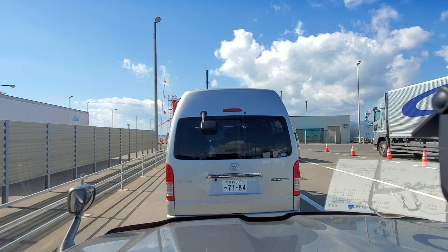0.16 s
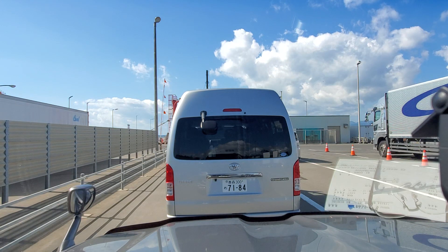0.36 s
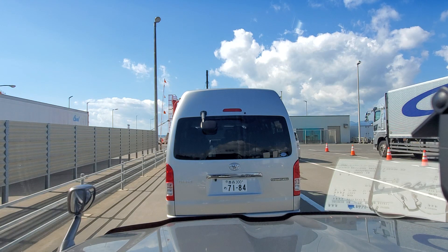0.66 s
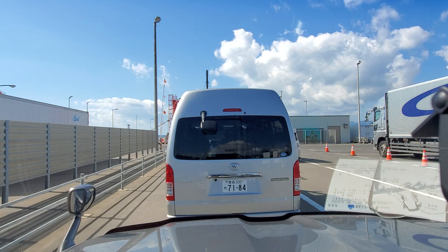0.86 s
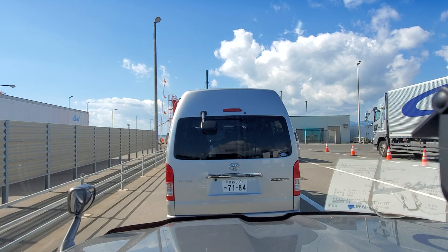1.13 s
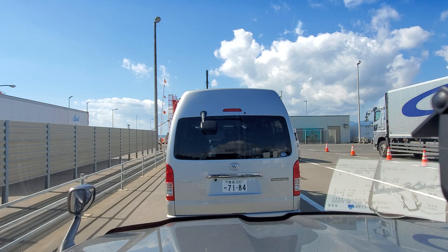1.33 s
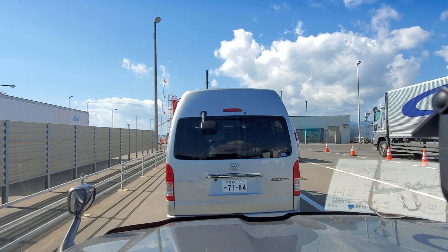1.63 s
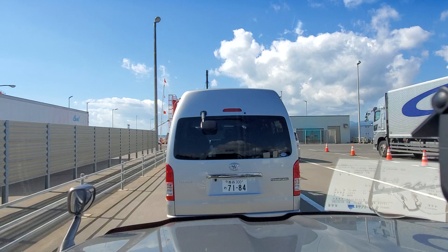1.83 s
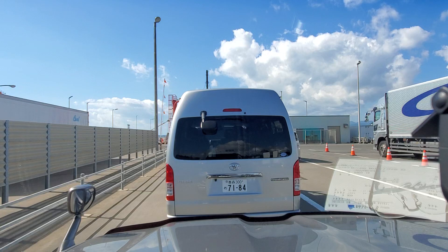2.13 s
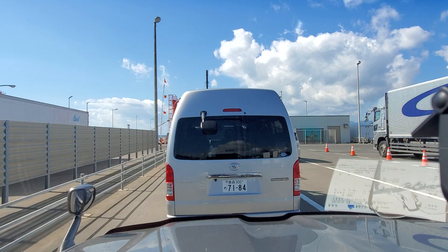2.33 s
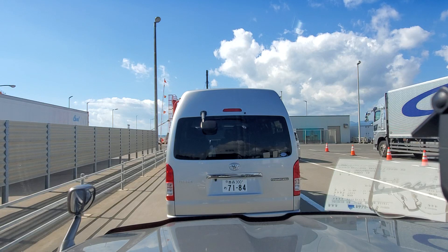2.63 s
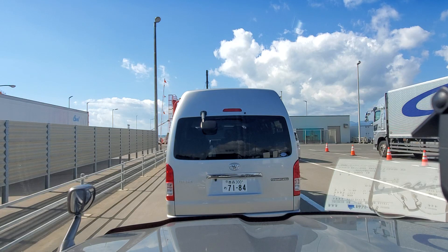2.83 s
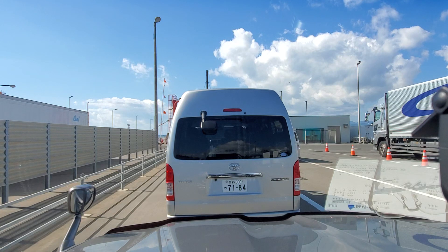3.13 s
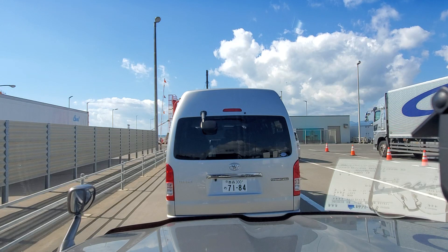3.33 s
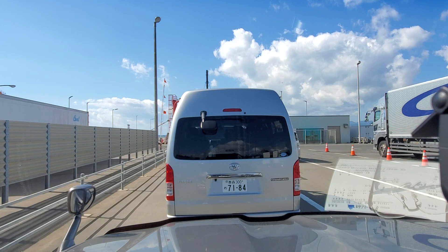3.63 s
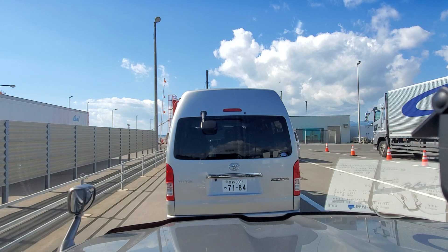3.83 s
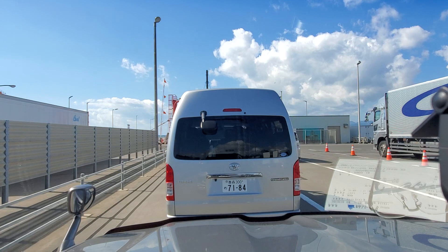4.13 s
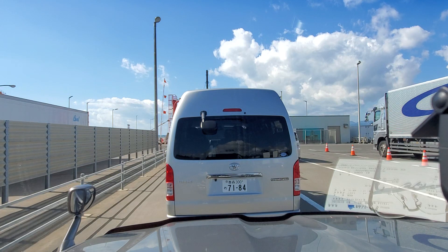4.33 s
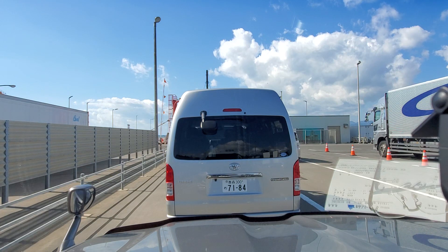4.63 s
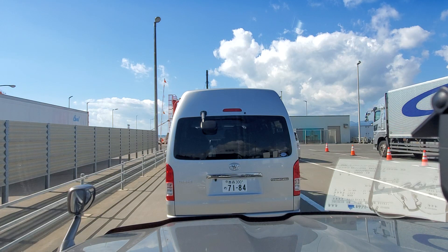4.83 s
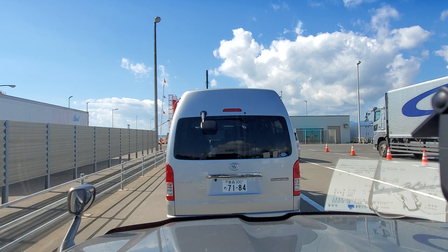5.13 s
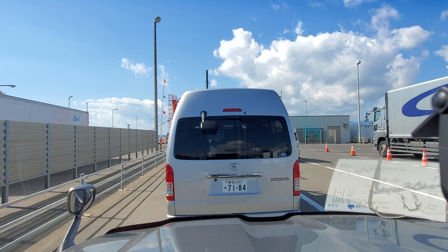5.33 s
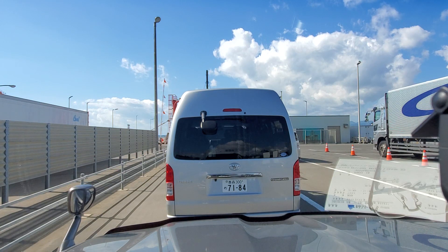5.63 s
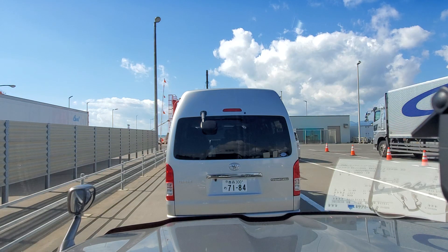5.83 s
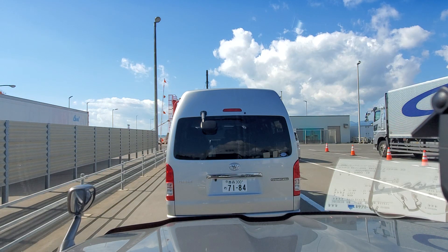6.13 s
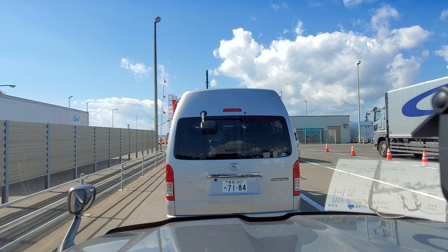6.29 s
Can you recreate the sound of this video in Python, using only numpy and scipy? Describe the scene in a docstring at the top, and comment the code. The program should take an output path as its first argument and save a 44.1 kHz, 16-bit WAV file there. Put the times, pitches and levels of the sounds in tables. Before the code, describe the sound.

Inside a waiting car, deep engine rumble pulses and slowly swells over light diesel knocking, while a short hiss of air sounds outside.

```python
"""Inside a car idling in a queue of vans and trucks. From the start its exhaust boom beats against the firing
tones of neighbouring engines, noise comes through the panels, a tone near 200 Hz drones and a diesel knocks; a
faint whistle comes and goes. Near 1.5 s the low throb shifts as engine tones near 53 and 57 Hz stand out, and
an air valve hisses briefly outside. After 4 s the boom swells, to be strongest near 6 s. A close pair of
microphones widens the middle range."""
import sys
import numpy as np
from scipy import signal
from scipy.fft import rfft, irfft, next_fast_len
from scipy.io import wavfile
from scipy.ndimage import uniform_filter1d, map_coordinates

SR = 44100
rng = np.random.default_rng(int(sys.argv[2]) if len(sys.argv) > 2 else 0)


def unload_wav(signal):
    """Save mono or channel-first audio to the path in sys.argv[1] as 16-bit WAV at rate SR, clipped to [-1, 1]."""
    wavfile.write(
        sys.argv[1],
        SR,
        np.round(np.clip(np.atleast_2d(signal).T, -1, 1) * 32767).astype(np.int16),
    )


N = 284871
TIME = np.arange(N) / SR
OPPOSITE = np.array([[1], [-1]])  # sign of a difference signal, left and right

# Noise spectra, common to both microphones or (SIDE) their difference.
# Each row: frequency in Hz, relative spectral density in dB.
RUMBLE_MID, RUMBLE_SIDE = [(10, -34), (20, -17), (29, -5), (38, -8), (43, -11), (52, -8), (62, -8),
                           (80, -10), (100, -13.5), (150, -13), (200, -15), (255, -17), (330, -25),
                           (360, -80)], [(12, -42), (20, -12.5), (33, -1), (48, 1), (60, -5), (118, -27),
                                           (195, 1.5), (233, -7), (295, -1), (340, -3), (440, -40),
                                           (750, -120)]
BODY_MID, BODY_SIDE = [(180, -25), (300, -5.5), (323, -5.5), (371, 1.5), (430, 2.5), (489, -5.5),
                       (557, -4.5), (644, 0.5), (689, -3), (759, -13.5), (863, -8.5), (939, -15.5),
                       (1030, -18.5), (1150, -16.5), (1500, -45), (2530, -120)], [(180, -35), (300, -3), (323, -4), (378, -8), (413, -17), (503, 2),
                                     (667, -11), (759, -4), (924, -4), (972, -6), (1060, -14), (1150, -9.5),
                                     (1500, -43), (2530, -120)]
CLATTER_MID, CLATTER_SIDE = [(620, -29), (1050, -10), (1240, 0), (1350, -5.5), (1460, -0.5), (1540, -0.5),
                             (1890, -4.5), (1980, -2.5), (2370, -3), (2490, -0.5), (3420, -11),
                             (3850, -11.5), (4600, -17), (5980, -30), (10100, -120)], [(620, -30.5), (1050, -4.5), (1130, -4), (1210, -10),
                                              (1310, 2.5), (1530, -3.5), (1660, -3.5), (1830, -9.5),
                                              (2300, -10.5), (2490, -7.5), (2950, -13), (3230, -9.5),
                                              (3480, -15), (4600, -22), (5980, -57), (10100, -120)]
AIR_MID, AIR_SIDE = [(2530, -27), (4300, -4.5), (5420, -5), (6760, -5), (8430, -12), (11700, -13),
                     (15600, -17.5)], [(2530, -30), (4300, -5), (5160, 1.5), (6230, -4.5), (7440, -4),
                                  (8430, -9.5), (11400, -9.5), (15600, -15)]
VALVE_SPECTRUM = [(2500, -30), (4000, 8), (7000, 1), (9000, -6), (12000, -2), (15700, -3)]
# Course of the rumble. Each row: time in seconds, level in dB.
RUMBLE_LEVELS = [(0, -34.5), (.7, -37), (1.3, -36.5), (2.2, -37), (3.1, -33), (3.9, -35.5), (4.6, -34.5),
                 (5.5, -35), (6.46, -34)]
# Slowly growing noise bands. Each row: time in seconds, base levels of body, clatter and air in dB.
BAND_LEVELS = [(0, -42.5, -48, -62), (1, -41.5, -47.5, -61), (2.7, -41, -47.6, -61),
               (4.3, -41, -46.2, -59.5), (6.46, -40, -45.1, -58.5)]
# Bands thinned by reflections. Each row: centre in Hz, width in Hz, depth in dB.
REFLECTION_NOTCHES = [(2070, 40, 3), (2380, 35, 4), (2620, 40, 3), (3100, 45, 4), (3570, 50, 2),
                      (4080, 80, 4), (4330, 30, 2.5), (4570, 60, 3.5), (5300, 80, 1.5), (5850, 90, 1.5),
                      (7120, 60, 3), (8350, 120, 2)]

# Whistle glides. Each row: start and length in seconds, first, middle and last pitch in Hz, level in dB.
WHISTLE_GLIDES = [(.38, .65, 7300, 9400, 7000, -77.5), (2.3, .8, 7500, 8750, 8650, -77.5),
                  (4.45, .65, 8000, 8850, 6600, -77), (5.75, .8, 9050, 9170, 9200, -77)]
# Tiny ticks. Each row: start in seconds, frequency in Hz, level in dB, time to fall 60 dB in seconds.
HIGH_TICKS = [(1.82, 11900, -56, .05), (1.824, 13300, -60, .04), (1.822, 15300, -62, .03),
              (3.128, 8750, -56, .05)]
# Weak hums. Each row: start and end of the held part in seconds, frequency in Hz, level in dB,
# relative difference signal in dB.
WEAK_HUMS = [(0, 6.46, 158.8, -48.5, -12), (0, 6.46, 342.2, -59, 1), (0, 1.7, 382.9, -54, -2),
             (0, 1.7, 440.3, -55, -2), (4.3, 6.46, 446.4, -56.5, -2)]
# A wide hum and a drone near 200 Hz. Each row: time in seconds, frequency in Hz, level in dB.
WIDE_HUM, DRONE_NEAR_200 = [(0, 297.5, -71), (3.6, 299.5, -72), (4.2, 296.4, -57), (5.2, 296, -53),
                         (6.46, 297.4, -64)], [(0, 200.3, -63), (.19, 200.3, -47.5), (1.19, 200.3, -39.5),
                                        (1.35, 200.3, -57), (1.5, 202, -36), (1.85, 202, -51),
                                        (1.94, 202, -33), (2.16, 202, -41.5), (2.2, 202, -48),
                                        (2.32, 202, -37), (2.52, 202, -46.5), (2.66, 202, -42),
                                        (2.75, 202, -58), (2.81, 202, -39), (2.93, 202, -35),
                                        (3.23, 202, -58), (3.37, 202, -40), (3.56, 202, -35),
                                        (3.64, 200.5, -44.5), (4.02, 200.5, -39), (4.2, 200.5, -43.5),
                                        (4.47, 200.5, -41.5), (4.67, 200.5, -33.5), (5.14, 202, -45),
                                        (5.2, 202, -38.5), (5.46, 202, -33.5), (5.58, 202, -40),
                                        (5.66, 202, -34.5), (5.98, 202, -31.5), (6.3, 202, -39.5),
                                        (6.36, 202, -47)]
# Valve openings. Each row: start in seconds, time open in seconds, level before the sag in dB.
VALVE_PUFFS = [(1.525, .2, -57.5), (1.815, .05, -62)]

# Engine block modes. Each row: frequency in Hz, relative level in dB, time to fall 60 dB in seconds.
BLOCK_MODES = [(1245, -2, .11), (1490, -2, .08), (1595, -4, .14), (1770, -3, .08), (1995, -2, .12),
               (2190, -4, .09), (2320, -3, .14), (2430, -5, .08), (2510, 1.5, .09), (2565, -3, .08),
               (2770, -2.5, .13), (3030, -9, .09), (3160, -6, .11), (3820, -7, .06), (3900, -9, .06),
               (4220, -6, .07), (4900, -15, .05)]
# Knocks that ring brightly. Each row: time in seconds, boost of the modes near BRIGHT_HZ in dB.
KNOCK_ACCENTS = [(.22, 4), (.32, 7), (.73, 5), (1.15, 6), (1.25, 7), (1.46, 5), (1.88, 5), (2.39, 4),
                 (3.79, 5), (4.16, 5), (4.21, 5), (4.26, 7), (4.47, 6), (4.88, 6), (5.14, 6), (5.19, 6),
                 (5.4, 6), (5.51, 7), (5.71, 5), (5.92, 8), (6.02, 8), (6.23, 4), (6.28, 5)]
BRIGHT_HZ, BRIGHT_WIDTH_HZ = 2500, 250
INJECTION_HZ, STRONG_KNOCK_S = 19.28, 5.402  # the series is timed from one strong knock

# Engine firing tones. Each row: time in seconds, firing frequency in Hz, level in dB.
CAR_RUN, VAN_RUN, TRUCK_RUN = [(0.0, 50.68, -26.0), (0.6, 50.76, -20.3), (1.2, 50.46, -19.9),
                               (1.8, 50.53, -20.1), (2.4, 50.65, -22.3), (3.0, 50.74, -22.2),
                               (3.6, 50.46, -21.0), (4.2, 50.55, -18.9), (4.8, 50.43, -15.1),
                               (5.4, 50.41, -14.5), (6.0, 50.41, -14.2), (6.46, 50.37, -16.4)], [(0, 44.62, -28), (6.46, 44.62, -31.2)], [(0, 41.335, -36.5), (6.46, 41.335, -36.5)]
SHIFTING_RUN, FAR_RUN, EMERGING_RUN = [(0, 53.82, -40.6), (1.2, 53.82, -31.3), (1.585, 57.02, -33.7),
                                       (6.46, 56.96, -35)], [(0, 48.0, -41), (6.46, 48.0, -41)], [(0, 52.96, -60),
                                                                                 (1.15, 52.96, -56),
                                                                                 (1.55, 52.96, -38),
                                                                                 (3.3, 52.96, -37),
                                                                                 (4.2, 52.96, -41.5),
                                                                                 (5.3, 52.96, -38),
                                                                                 (6.46, 52.96, -38)]
# Engine orders. Each row: multiple of the firing frequency, level relative to the firing tone in dB,
# relative difference signal in dB.
CAR_PARTIALS, VAN_PARTIALS = [(1, 0, -24), (.5, -29, -19), (5, -34, -3)], [(1, 0, -21), (1.5, -19, -22), (2, -9, -22), (3, -22, -20),
                                                  (4, -26, -3), (5, -26, -3), (6, -23, -2)]
TRUCK_PARTIALS, SHIFTING_PARTIALS = [(1, 0, -23), (2, -11, -12), (2.5, -8, -18), (3, -12, -20),
                                     (4, -11.5, -11)], [(1, 0, -23), (.5, -8, -21), (1.5, -12, -15),
                                                           (2.5, -17, -20)]
FAR_PARTIALS, EMERGING_PARTIALS = [(.5, -2, -19), (1, -2, -22), (1.25, -5, -16), (1.5, -11, -21),
                                   (2, -12.5, -17), (2.5, -12, -14), (3.5, -12, -8)], [(1, 0, -24), (.5, -8, -21)]
# First firing in seconds of the car, van, truck, shifting tone, far truck and emerging tone.
FIRST_FIRING_S = [.0001, .0193, .0012, .0164, .01, .0117]
# The car's third order. Each row: time in seconds, level in dB.
CAR_THIRD_ORDER = [(0, -58), (.7, -49), (1.25, -44), (1.75, -48), (2.4, -45), (3.3, -43), (3.8, -45),
                   (4.3, -51), (5.3, -49), (6.46, -46)]
# Unequal colour of the microphones. Each row: frequency in Hz, left minus right in dB.
MIC_IMBALANCE = [(60, -.6), (110, 1.2), (200, 1), (380, -2), (700, -1.5), (1290, -1.5), (2380, -.8),
                 (4400, -3), (8120, -2.5), (15000, -.8)]


def amp(db):
    """Amplitude ratio: a factor of ten for every 20 dB."""
    return 10 ** (np.asarray(db) / 20)


def unit(x):
    """Normalisation to an rms of 1."""
    return x / np.sqrt(np.mean(x ** 2) + 1e-20)


def along(points, hz):
    """Interpolation of (Hz, value) points on a logarithmic frequency axis."""
    point_hz, values = np.transpose(points)
    return np.interp(np.log(hz + 1), np.log(point_hz + 1), values)


def curves(rows):
    """Linear interpolation in time: one value per sample for each column after the first."""
    times, *columns = np.transpose(rows)
    return [np.interp(TIME, times, column) for column in columns]


def wobble(rate):
    """Smooth random modulation: a spline through `rate` random knots a second."""
    knots = rng.standard_normal(int(N * rate / SR) + 4)
    spline = map_coordinates(knots, [np.arange(8 * len(knots)) / 8])
    return np.interp(TIME * rate, np.arange(len(spline)) / 8, spline)


def filtered(x, response):
    """Linear filtering: the spectrum is multiplied by a frequency response."""
    size = next_fast_len(N + 8192, real=True)
    return irfft(rfft(x, size) * response(np.fft.rfftfreq(size, 1 / SR)), size)[..., :N]


def stereo_noise(mid_spectrum, side_spectrum, side_db, patchy_db):
    """Partial coherence: noise with patches of random gain, as a common and a difference signal."""
    spectra = signal.stft(rng.standard_normal((2, N)), nperseg=512)[2]
    patches = rng.standard_normal(spectra.shape[1:])
    patches = uniform_filter1d(uniform_filter1d(patches, size=9, axis=0), size=9, axis=1)
    common, other = signal.istft(spectra * amp(patchy_db * unit(patches)), nperseg=512)[1][:, :N]
    # A slightly shifted copy in the difference signal makes the two channels partly alike.
    other = other - .35 * np.roll(common, -20)
    mid = unit(filtered(common, lambda hz: amp(along(mid_spectrum, hz))))
    side = unit(filtered(other, lambda hz: amp(along(side_spectrum, hz))))
    return mid + amp(side_db) * side * OPPOSITE


def tone(cycles, level_db, side_db, unsteady_db, rate=3.03):
    """Phase difference: an unsteady sinusoid whose difference signal lies a quarter cycle apart."""
    envelope = np.sqrt(2) * amp(level_db + unsteady_db * wobble(rate))
    phase = 2 * np.pi * cycles
    return envelope * (np.cos(phase) + amp(side_db) * np.sin(phase) * OPPOSITE)


def reflection_gain(hz):
    """Destructive interference: reflections off glass and dashboard thin out narrow bands."""
    dips_db = sum(db * np.exp(-((hz - centre) / width) ** 2) for centre, width, db in REFLECTION_NOTCHES)
    return amp(.44 - dips_db)


def engine_noise():
    """Transmission through panels: four noise bands, the upper three swelling slightly per injection."""
    body_db, clatter_db, air_db = curves(BAND_LEVELS)
    pulse = np.cos(2 * np.pi * INJECTION_HZ * (TIME - STRONG_KNOCK_S - .008))
    rumble_gain = amp(curves(RUMBLE_LEVELS)[0])
    rumble = rumble_gain * stereo_noise(RUMBLE_MID, RUMBLE_SIDE, side_db=-8, patchy_db=1.3)
    body_gain = amp(body_db + .36 * pulse)
    body = body_gain * stereo_noise(BODY_MID, BODY_SIDE, side_db=5.5, patchy_db=.92)
    clatter_gain = amp(clatter_db - .77 + .18 * pulse)
    clatter = clatter_gain * stereo_noise(CLATTER_MID, CLATTER_SIDE, side_db=3, patchy_db=1)
    air_gain = amp(air_db + .3 * pulse + .28 * wobble(25))
    air = air_gain * stereo_noise(AIR_MID, AIR_SIDE, side_db=.5, patchy_db=1.2)
    return rumble + body + filtered(clatter + air, reflection_gain)


def whistle(fade_s=.1):
    """Random amplitude modulation blurs a faint tone whose pitch glides along parabolas."""
    sound, fuzz = 0, unit(wobble(150))
    for start, length, first, middle, last, db in WHISTLE_GLIDES:
        progress = np.clip((TIME - start) / length, 0, 1)
        arch_hz = (4 * middle - 2 * first - 2 * last) * progress * (1 - progress)
        hz = first + (last - first) * progress + arch_hz
        fade = np.clip(np.minimum(progress, 1 - progress) * length / fade_s, 0, 1) ** 2
        sound += np.sqrt(2) * amp(db) * fade * fuzz * np.sin(2 * np.pi * np.cumsum(hz) / SR)
    return sound


def ring(t, hz, db, t60):
    """Damped oscillation in complex form: a quick rise, then exponential decay."""
    return amp(db - 60 * t / t60) * (1 - np.exp(-t / .002)) * np.exp(2j * np.pi * hz * t)


def ticks():
    """Rapid damping makes a few high tones sound as ticks."""
    return sum(ring(np.maximum(TIME - start, 0), hz, db, t60).imag for start, hz, db, t60 in HIGH_TICKS)


def weak_hums(fade_s=.3):
    """Pure tones of constant frequency hum faintly, fading outside their held spans."""
    sound = 0
    for start, end, hz, db, side_db in WEAK_HUMS:
        fade = np.clip(1 + np.minimum(TIME - start, end - TIME) / fade_s, 0, 1)
        sound += fade * tone(hz * TIME, db, side_db, unsteady_db=1.5)
    return sound


def wide_hum():
    """Phase opposition: a hum sounds wide when it is almost opposite at the two microphones."""
    hz, db = curves(WIDE_HUM)
    return tone(np.cumsum(hz) / SR, db, side_db=5, unsteady_db=2.5)


def drone_near_200():
    """A tone near 200 Hz drones, shifting between close pitches as it swells, wavers and drops out."""
    hz, db = curves(DRONE_NEAR_200)
    return tone(np.cumsum(hz) / SR, db, side_db=-5, unsteady_db=.47, rate=9)


def air_valve(attack_s=.05, sag_db_per_s=22, close_db_per_s=80):
    """Jet noise: compressed air escapes in a short hiss and a small after-puff."""
    envelope = 0
    for start, open_s, db in VALVE_PUFFS:
        t = TIME - start
        fall_db = sag_db_per_s * np.clip(t, 0, open_s) + close_db_per_s * np.maximum(t - open_s, 0)
        envelope += np.clip(t / attack_s, 0, 1) ** 2 * amp(db - fall_db)
    return envelope * stereo_noise(VALVE_SPECTRUM, VALVE_SPECTRUM, side_db=-2, patchy_db=0)


def diesel_knock():
    """Impulse excitation: knocks, strong and weak in turn, ring the block's modes at random strengths."""
    sound, t = np.zeros((2, N + SR)), np.arange(SR // 8) / SR
    hz, db, t60 = np.transpose(BLOCK_MODES)[:, :, None]
    modes = ring(t, hz, db, t60)
    level_db = curves(BAND_LEVELS)[1] - 5  # follows the clatter band
    # Each mode reaches the two microphones at its own phase.
    mic_phases = np.exp(1j * rng.uniform(-.9, .9, len(modes)) * OPPOSITE)
    bright = np.exp(-((hz[:, 0] - BRIGHT_HZ) / BRIGHT_WIDTH_HZ) ** 2)
    accent_db = {round((s - STRONG_KNOCK_S) * INJECTION_HZ): boost for s, boost in KNOCK_ACCENTS}
    for k in range(-int(STRONG_KNOCK_S * INJECTION_HZ), int((N / SR - STRONG_KNOCK_S) * INJECTION_HZ)):
        start = STRONG_KNOCK_S + k / INJECTION_HZ + rng.normal(0, .0015)
        at = max(0, round(start * SR))
        scatter_db = rng.normal(0, 4.5, len(modes)) * (1 - .6 * bright)
        strengths = amp(level_db[at] - 2 * (k % 2) + scatter_db + accent_db.get(k, 0) * bright)
        phases = np.exp(2j * np.pi * rng.random(len(modes)))
        sound[:, at:at + len(t)] += np.imag(mic_phases * strengths * phases @ modes)
    return sound[:, :N]


def engine(run, first_firing_s, partials):
    """Periodic firing locks orders to the crank; paths of unlike length shift their phases."""
    hz, level_db = curves(run)
    firings = np.cumsum(hz) / SR - first_firing_s * hz[0]
    sound = 0
    for order, db, side_db in partials:
        other_order = order != 1  # the firing tone itself keeps its phase and is steadier
        cycles = order * firings + other_order * rng.random()
        sound += tone(cycles, level_db + db, side_db, unsteady_db=.2 + 1.3 * other_order)
    return sound


def idling_engines():
    """Beats: the car's exhaust boom and five neighbouring engine tones lie at nearby frequencies."""
    runs = CAR_RUN, VAN_RUN, TRUCK_RUN, SHIFTING_RUN, FAR_RUN, EMERGING_RUN
    partials = (CAR_PARTIALS, VAN_PARTIALS, TRUCK_PARTIALS,
                SHIFTING_PARTIALS, FAR_PARTIALS, EMERGING_PARTIALS)
    car_firings = np.cumsum(curves(CAR_RUN)[0]) / SR
    third_order = tone(3 * car_firings, curves(CAR_THIRD_ORDER)[0], side_db=-11, unsteady_db=1)
    return third_order + sum(map(engine, runs, FIRST_FIRING_S, partials))


def scene():
    """Superposition: the pressures of all sources add at the dashboard."""
    tones = idling_engines() + drone_near_200() + wide_hum() + weak_hums()
    return tones + engine_noise() + diesel_knock() + air_valve() + whistle() + ticks()


def record(dry, top_hz=15720):
    """Frequency response: the two microphones differ a little in colour and share a band limit."""
    def response(hz):
        return amp(along(MIC_IMBALANCE, hz) / 2 * OPPOSITE) * (hz < top_hz)

    # The sound is already under way, so its opening step bypasses the filter.
    opening = dry[:, :1] * np.exp(-TIME / .05)
    return opening + filtered(dry - opening, response)


dry = scene()
out = record(dry)
unload_wav(out)
```